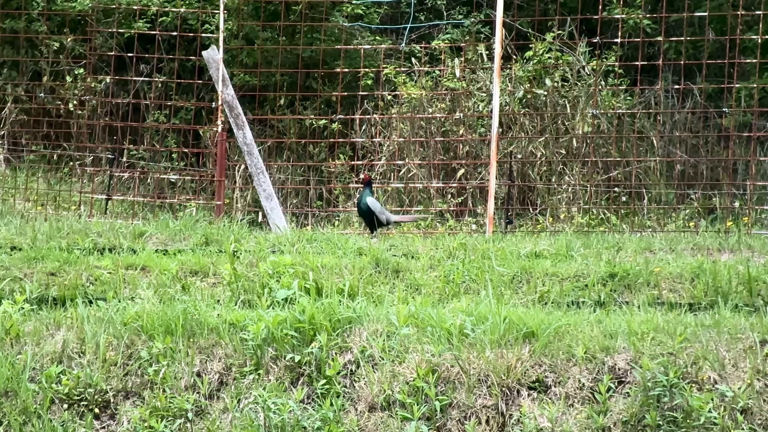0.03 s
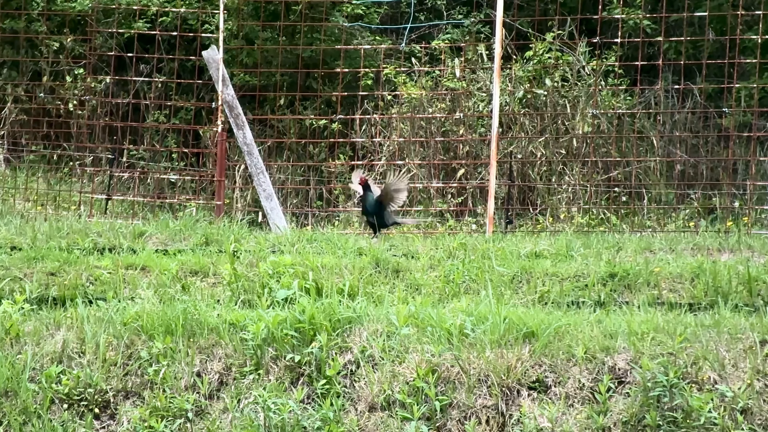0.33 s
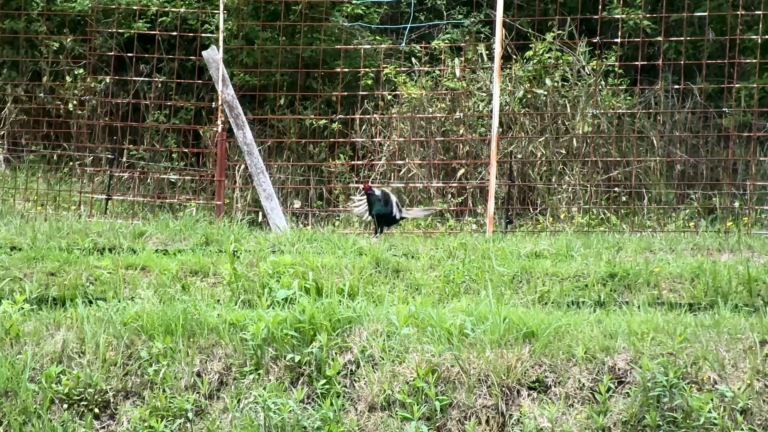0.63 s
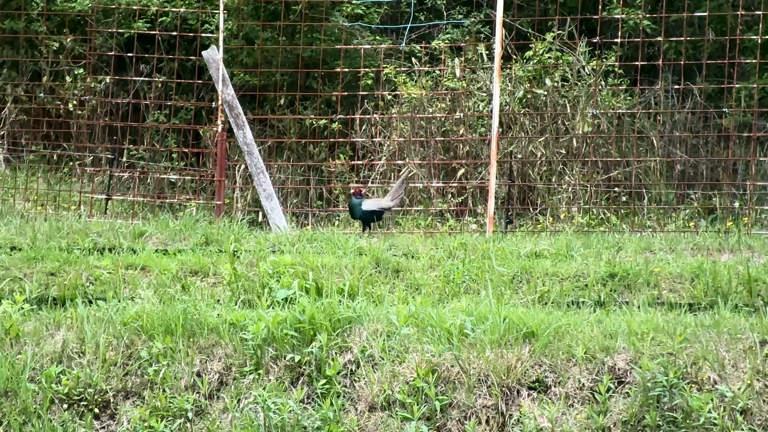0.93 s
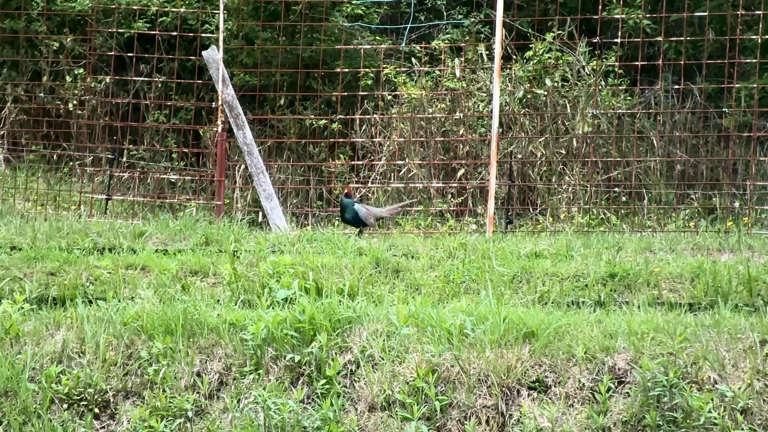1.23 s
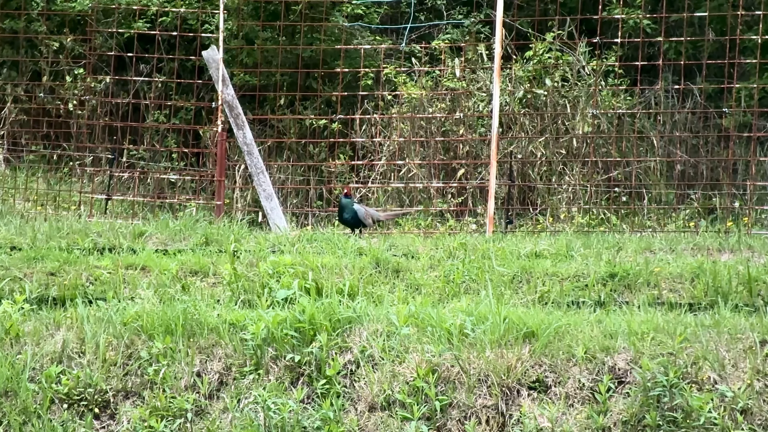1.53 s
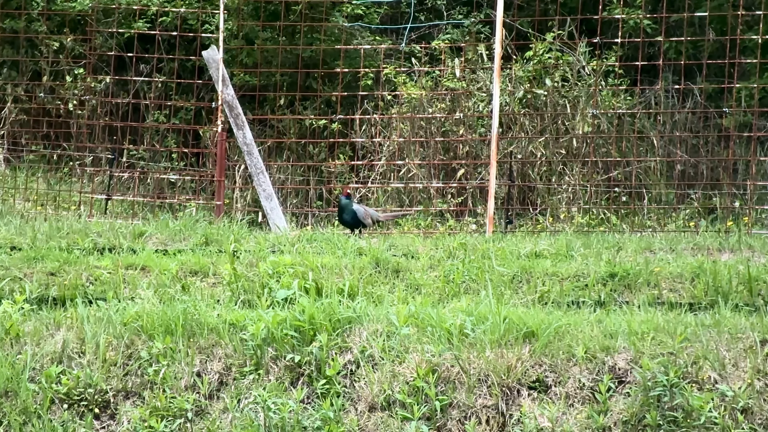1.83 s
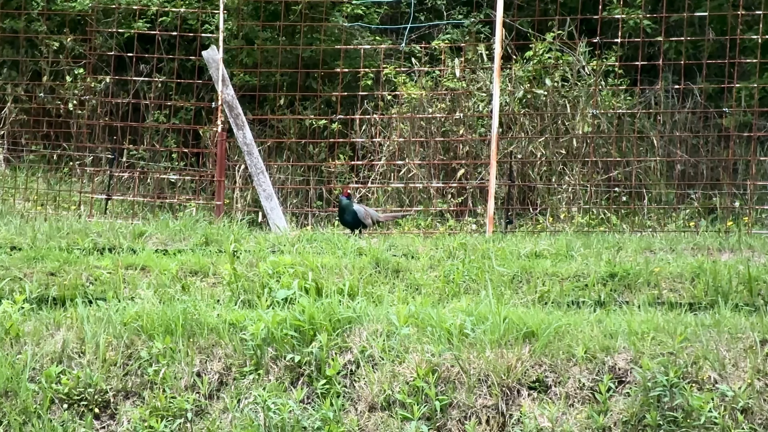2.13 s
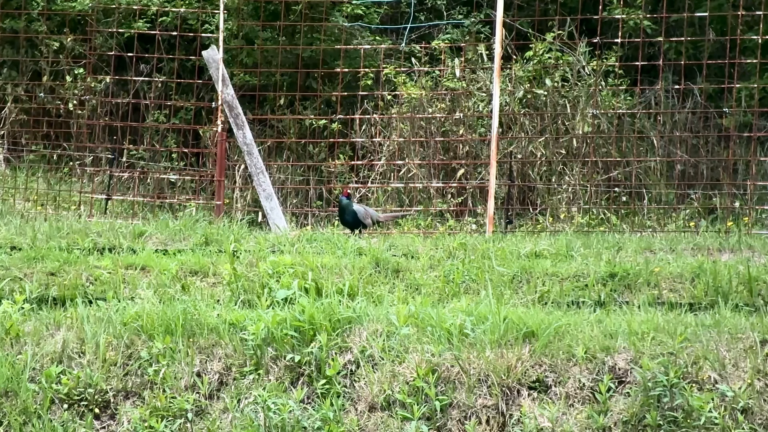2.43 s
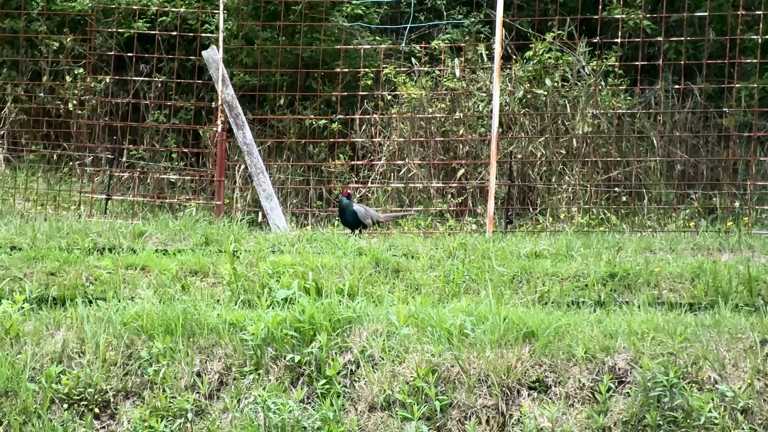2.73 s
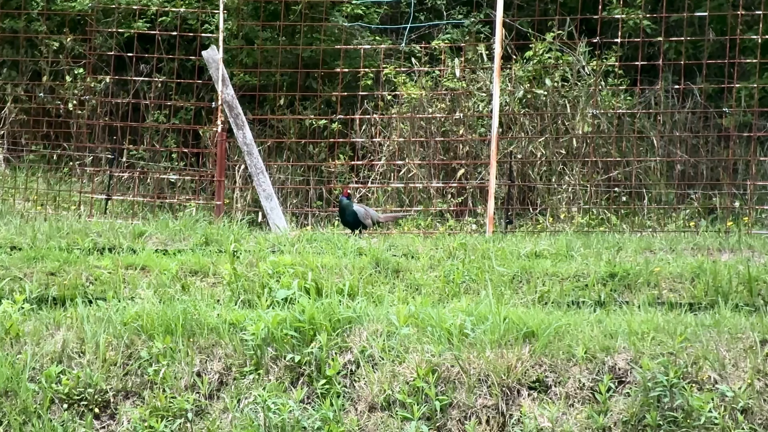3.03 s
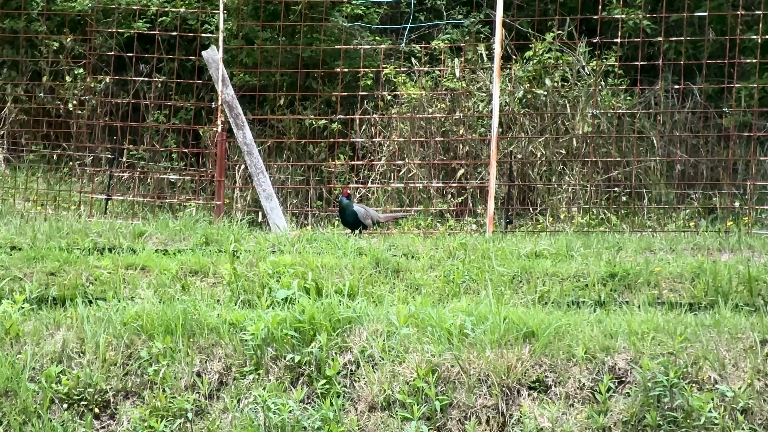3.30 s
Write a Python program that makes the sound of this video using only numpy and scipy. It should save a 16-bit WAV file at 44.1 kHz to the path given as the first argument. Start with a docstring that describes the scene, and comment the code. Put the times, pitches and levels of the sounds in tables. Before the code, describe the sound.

A pheasant crows twice hoarsely, then whirs its wings, over faint birds and rustling leaves.

```python
"""At the edge of a wood, a pheasant gives a two-note crow and drums its wings; the trees throw it back.
The crow is a rough pulse train filtered by throat and beak, and each wing stroke is a low puff of air.
Small birds chip and whistle in gliding tones over the noise of leaves, gurgling water and low wind.
A faint hum fades early; a hollow knock of damped modes and a soft low bump sound close by."""
import sys
import numpy as np
from scipy import signal
from scipy.fft import rfft, irfft, next_fast_len
from scipy.io import wavfile
from scipy.ndimage import uniform_filter1d

SR = 44100
rng = np.random.default_rng(int(sys.argv[2]) if len(sys.argv) > 2 else 0)


def generate_wav(signal):
    """Clip the signal to [-1, 1] and save it as 16-bit WAV at the path in sys.argv[1]."""
    frames = np.transpose(np.atleast_2d(signal))
    scaled = np.clip(frames, -1, 1) * 32767
    pcm = np.round(scaled).astype(np.int16)
    wavfile.write(sys.argv[1], SR, pcm)


N = 176400
TIME = np.arange(N) / SR


def amp(db):
    """Decibels to amplitude ratio."""
    return 10 ** (np.asarray(db) / 20)


def unit(x):
    """Normalisation to rms 1."""
    return x / np.sqrt(np.mean(x ** 2) + 1e-20)


def read(points, hz):
    """Interpolation on a log-frequency axis."""
    f, value = np.transpose(points)
    return np.interp(np.log(hz + 1), np.log(f + 1), value)


def colour(x, points):
    """Zero-phase filtering by (frequency [Hz], gain [dB]) points."""
    size = next_fast_len(x.shape[-1] + 2048)
    gain = amp(read(points, np.fft.rfftfreq(size, 1 / SR)))
    return irfft(rfft(x, size) * gain, size)[..., :x.shape[-1]]


def wander(size, hz):
    """Random modulation: noise of rms 1, low-passed at hz."""
    rolloff = 1 + (np.fft.rfftfreq(N, 1 / SR) / hz) ** 4
    return unit(irfft(rfft(rng.standard_normal(N)) / rolloff, N))[:size]


def tone(hz):
    """A sine whose phase is the integral of frequency."""
    return np.sin(2 * np.pi * np.cumsum(hz) / SR)


def add(mix, s, sound):
    """Superposition of a sound at time s."""
    part = mix[max(round(s * SR), 0):][:len(sound)]
    part += sound[:len(part)]


def swell(t, peak_s):
    """Gamma envelope: a soft rise to 1 at peak_s, then a quick decay."""
    return (t / peak_s * np.exp(1 - t / peak_s)) ** 2


# decay of the wood (frequency [Hz], reverberation time [s])
WOOD_T60 = [(100, 0.13), (1150, 0.92), (2500, 1), (4300, 0.7), (7000, 0.24), (15000, 0.5)]
def wood(x, wet_db, alike):
    """Reverberation: trees scatter dense echoes, the same in both channels when alike is 1."""
    hz, t, noise = signal.stft(rng.standard_normal((2, SR)), SR, nperseg=256)
    decay = amp(-60 * t / read(WOOD_T60, hz)[:, None])
    rise = 1 - np.exp(-t / .014)
    mid, side = signal.istft(noise * decay * rise, SR, nperseg=256)[1]
    side = side * np.sqrt(1 - alike)
    tail = np.array([mid + side, mid - side]) / np.linalg.norm(mid)
    return x + amp(wet_db) * signal.fftconvolve(x[None], tail, axes=1)[:, :len(x)]


# damping of the upper resonance by a shut beak (frequency [Hz], gain [dB])
SHUT_BEAK = [(1200, 3.5), (3600, 1), (4100, -0.5), (4450, 1), (4800, -10), (5300, -10), (5800, -1)]
def note(curve, throat, odd_db, half_db, rattle, rasp, level_db):
    """Source-filter voice: uneven pulses add subharmonics, and a slower oscillator adds sidebands."""
    s, pitch, effort, beak = np.transpose(curve)
    t = np.arange(s[0], s[-1], 1 / SR)
    jitter = 1 + .014 * wander(len(t), 320)
    cycles = np.cumsum(np.interp(t, s, pitch) * jitter) / SR
    shake = tone(165.3 * (1 + .07 * wander(len(t), 61)))
    k = np.arange(2, 49)[:, None] / 2  # harmonic numbers, in half steps
    strength = amp(odd_db * (k % 2 == 1) + half_db * (k % 1 > 0))
    pulses = (strength * np.cos(2 * np.pi * k * (cycles + .075 * rattle * shake) + k ** 2)).sum(0)
    source = (unit(pulses) + rasp * rng.standard_normal(len(t))) * (1 + rattle * shake / 2)
    voice = unit(colour(source, throat))
    opening = np.interp(t, s, beak)
    voice = opening * voice + (1 - opening) * colour(voice, SHUT_BEAK)
    return s[0], voice * amp(level_db + np.interp(t, s, effort))


# vocal gestures (time [s], pitch [Hz], effort [dB], beak opening [0-1])
NOTE_1 = [(-.12, 578, 0, 1), (-.05, 580, -1.5, 0.7), (.005, 577.4, 2, 0.9), (.055, 569.7, -4, 0.96),
          (.10, 562.6, -0.5, 0.36), (.135, 572, -10, 0.3), (.17, 552, -35, 0)]
NOTE_2 = [(.355, 556.7, -23, 0), (.372, 573, -2, 0), (.40, 587.3, -2.5, 0.42), (.417, 581.5, -1.5, 1),
          (.446, 590.6, 1.5, 0.86), (.462, 590, -12, 0.51), (.48, 598.6, -1, 0), (.5, 636, -30, 0.54)]
NOTE_2_END = [(.44, 396.8, -20, 1), (.47, 404.2, -3, 0.7), (.495, 408, -7, 0.9), (.535, 411.8, -4, 0.55),
              (.57, 412.4, -8.5, 0.1), (.6, 414.4, -6, 0)]
# throat resonances of each note (frequency [Hz], gain [dB])
THROAT_1 = [(500, -26), (880, -14), (1050, -3.5), (1180, 1), (1450, -73), (1750, -25), (2300, -18),
            (2900, -17), (3450, -11.5), (4050, 0), (4600, 2), (4900, -13), (5220, 3.5), (5450, -12),
            (5750, -7.5), (6400, -22), (7200, -18), (8200, -41), (9200, -27), (15000, -64)]
THROAT_2 = [(500, -30.5), (880, -14.5), (1020, -1.5), (1210, -1), (1420, -28), (1800, -37), (2350, -18.5),
            (2900, -19.5), (3500, -8), (3800, -10.5), (4050, 2), (4450, 1.5), (4750, -1.5), (5280, 4.5),
            (5520, -7), (5820, -4), (6400, -16.5), (7200, -14), (8200, -54), (9200, -22), (9800, -30),
            (15000, -88)]
def crow():
    """Rough phonation: a hoarse note, then a harsher one that breaks to a slower pulse rate."""
    lead_s = .25  # the first note begins before time zero
    lead = round(lead_s * SR)
    out = np.zeros(lead + N)
    for s, voice in (
        note(NOTE_1, THROAT_1, odd_db=-5.5, half_db=-20, rattle=.12, rasp=.55, level_db=-43.5),
        note(NOTE_2, THROAT_2, odd_db=4, half_db=1.5, rattle=.27, rasp=.4, level_db=-39),
        note(NOTE_2_END, THROAT_2, odd_db=1, half_db=-36, rattle=.097, rasp=.3, level_db=-44),
    ):
        add(out, lead_s + s, voice)
    return wood(out, wet_db=-1.5, alike=.93)[:, lead:]


# stereo width (frequency [Hz], side minus mid [dB])
WASH_WIDTH = [(60, -24), (150, -12.5), (300, -11.5), (500, -1.5), (750, 0), (1200, -5.5), (2200, -23.5),
              (3300, -9), (4300, -19.5), (5500, -70), (15000, -59)]
def wash(spectrum, depth_db, patch_hz, patch_s):
    """Modulated stereo noise: the level drifts in patches of time and frequency."""
    frames = dict(nperseg=512, noverlap=384)
    noise = signal.stft(rng.standard_normal((2, N)), **frames)[2]
    patches = uniform_filter1d(rng.standard_normal(noise.shape[1:]), round(patch_hz * 512 / SR), 0)
    patches = unit(uniform_filter1d(patches, round(patch_s * SR / 128), 1))
    mottled = signal.istft(noise * amp(depth_db * patches), **frames)[1][:, :N]
    mid, side = colour(mottled, spectrum)
    side = colour(side, WASH_WIDTH)
    return unit(np.array([mid + side, mid - side]))


# rustle spectrum (frequency [Hz], relative density [dB])
LEAF_SPECTRUM = [(900, -15.5), (1700, -11.5), (2200, -7.5), (2800, -2), (3500, 4), (4300, 1.5),
                 (5200, -8.5), (6300, -12.5), (7400, -14), (8200, -32), (8800, -13), (9200, -21),
                 (10000, -14.5), (10800, -24), (11700, -49), (12600, -35), (13600, -19), (14500, -40),
                 (15700, -12)]
def leaves():
    """Incoherent summation: many leaves merge into a steady hiss."""
    return amp(-58.5) * wash(LEAF_SPECTRUM, depth_db=2.5, patch_hz=600, patch_s=.026)


# clearer ticks (time [s], level [dB])
LEAF_TICKS = [(0.793, -50.5), (.994, -72), (1.247, -50.5), (1.345, -57), (1.528, -53.5), (1.596, -57),
              (1.741, -50.5), (2.138, -57), (2.29, -47.5), (2.443, -57), (2.986, -54), (3.392, -56),
              (3.448, -53), (3.577, -59), (3.602, -57)]
# their spectrum (frequency [Hz], gain [dB])
TICK_SPECTRUM = [(800, -28), (2000, 2), (4000, 6), (7000, 0), (8200, -5), (9200, -13.5), (10000, -3.5),
                 (12000, -30.5), (15000, -22)]
def ticks(per_s, spread_db, level_db):
    """Shot noise: a fine random crackle among the leaves, with a few clearer ticks."""
    impulses = amp(spread_db * np.minimum(rng.exponential(1, N), 2)) * (rng.random(N) < per_s / SR)
    t = np.arange(0, .008, 1 / SR)
    envelope = amp(level_db) * unit(signal.oaconvolve(impulses, np.exp(-t / .00032))[:N])
    for s, db in LEAF_TICKS:
        add(envelope, s, amp(db) * np.exp(-t / .0038))
    return envelope * unit(colour(rng.standard_normal(N), TICK_SPECTRUM))


# flow spectrum (frequency [Hz], relative density [dB]) and strength (time [s], level [dB])
WATER_SPECTRUM = [(60, 1), (150, -3.5), (300, 0.5), (400, -3), (520, -1.5), (800, -0.5), (1000, 3),
                  (1270, 1.5), (1550, -10), (2200, -50), (5000, -33.5)]
WATER_LEVEL = [(0, -61), (.8, -57.5), (1.2, -59.5), (1.55, -58.5), (1.95, -58.5), (2.45, -60), (2.8, -59),
               (2.96, -63.5), (3.15, -62.5), (3.3, -60.5), (3.55, -57.5), (3.66, -66.5), (4, -68)]
def water():
    """Flow noise: running water swells and ebbs."""
    envelope = amp(np.interp(TIME, *np.transpose(WATER_LEVEL)))
    return envelope * wash(WATER_SPECTRUM, depth_db=3.5, patch_hz=200, patch_s=.032)


# rumble spectrum (frequency [Hz], relative density [dB]) and gusts (time [s], level [dB])
WIND_SPECTRUM = [(15, -24), (30, -21), (50, -3), (75, 0.5), (110, -5), (170, -9.5), (260, -30), (600, -72)]
WIND_LEVEL = [(0, -58.5), (.6, -61.5), (1.1, -58), (1.22, -74), (1.31, -55.5), (1.42, -63), (1.9, -63),
              (2.1, -71), (2.55, -60), (2.95, -73), (3.1, -60.5), (3.3, -71), (3.55, -68), (3.7, -71.5),
              (4, -81)]
def wind():
    """Turbulence: slow pressure fluctuations make a low rumble."""
    envelope = amp(np.interp(TIME, *np.transpose(WIND_LEVEL)))
    return envelope * wash(WIND_SPECTRUM, depth_db=1.5, patch_hz=200, patch_s=.058)


def hum():
    """Slight frequency modulation: a faint low tone wavers and fades."""
    return amp(np.interp(TIME, [0, .6, .9], [-58, -58, -85])) * tone(105 + 2 * wander(N, 13))


# water blips (time [s], level [dB], frequency [Hz])
BLIPS = [(.21, -50.5, 648), (1.421, -55.5, 259), (1.558, -49, 653), (1.866, -59.5, 456),
         (2.155, -54.5, 475), (2.21, -57, 520), (2.31, -57, 536), (2.374, -49.5, 810), (2.45, -51, 480),
         (2.453, -59, 738), (2.521, -56, 164.5), (2.63, -56.5, 257), (3.036, -53, 1250), (3.25, -55.5, 820),
         (3.3, -54.5, 523)]
def gurgles():
    """Damped resonance: hollow blips of water, unsteady in pitch."""
    out, t = np.zeros(N), np.arange(0, .08, 1 / SR)
    for s, db, hz in BLIPS:
        add(out, s, amp(db) * swell(t, peak_s=.012) * tone(hz + 64.7 * wander(len(t), 174)))
    return wood(out, wet_db=-7.5, alike=.89)


# short high chips (time [s], level [dB], frequency [Hz])
HIGH_CHIPS = [(.266, -49.5, 2590), (0.766, -37.5, 3430), (0.834, -41, 3550), (0.909, -46.5, 4140),
              (1.066, -45.5, 4150), (1.082, -46.5, 3130), (1.677, -48, 3290), (1.833, -44.5, 3560),
              (1.942, -50.5, 3400), (2.308, -38.5, 3400), (2.566, -48.5, 2750), (2.676, -45, 3420),
              (2.709, -48.5, 3100), (3.508, -46.5, 3330), (3.654, -48.5, 3540), (3.699, -53, 2560),
              (3.825, -49, 3670), (3.846, -47, 3740), (3.86, -58, 2450), (3.96, -54, 2630)]
def chips(peak_s=.0018, fall_per_s=4):
    """Tone bursts: a small bird's calls, mixed with fainter, lower leaf ticks or drips."""
    out, t = np.zeros(N), np.arange(0, .015, 1 / SR)
    for s, db, hz in HIGH_CHIPS:
        pitch = hz * np.exp(-fall_per_s * (t - peak_s)) * (1 + .044 * wander(len(t), 600))
        add(out, s, amp(db) * swell(t, peak_s) * tone(pitch))
    return wood(out, wet_db=-11.5, alike=1)


# wing strokes (time [s], level [dB], frequency [Hz])
STROKES = [(.634, -48, 137), (.657, -49, 124), (.677, -47.5, 119), (.712, -42.5, 136), (0.752, -54, 100),
           (0.8, -44, 135), (.838, -51, 144), (.879, -47, 149), (0.9, -43.5, 114), (.949, -49, 120),
           (.976, -44.5, 115), (0.998, -54, 125), (1.026, -46.5, 145), (1.045, -48, 110), (1.093, -49, 142),
           (1.115, -48.5, 120), (1.145, -58, 135)]
def wings(peak_s=.005):
    """Air displacement: each stroke radiates a short low pressure pulse."""
    out, t = np.zeros(N), np.arange(0, .06, 1 / SR)
    for s, db, hz in STROKES:
        add(out, s, amp(db) * swell(t, peak_s) * np.cos(2 * np.pi * hz * (t - peak_s)))
    return wood(out, wet_db=-4, alike=.85)


# slurred calls (time [s], duration [s], start [Hz], middle [Hz], end [Hz], level [dB])
BIRD_SLURS = [(0.675, 0.057, 4250, 5060, 6200, -58.5), (0.754, 0.06, 4400, 5280, 4660, -54.5),
              (0.965, 0.037, 3680, 5070, 6120, -53), (0.966, 0.074, 3560, 5240, 6560, -60.5),
              (1.055, 0.031, 5820, 5100, 3650, -62), (1.212, .035, 3870, 5000, 5730, -62),
              (1.239, 0.12, 4140, 4170, 4330, -63), (1.467, 0.073, 3600, 3930, 4100, -57),
              (1.537, .018, 4900, 5420, 5840, -56.5), (1.562, 0.057, 3740, 4530, 5830, -57),
              (1.597, 0.041, 5500, 5980, 5370, -61), (1.748, 0.059, 3690, 3850, 4240, -55),
              (1.985, 0.084, 3550, 4080, 4430, -57), (2.047, 0.063, 4600, 5450, 6400, -72),
              (2.212, 0.041, 3620, 3700, 3950, -53.5), (2.445, 0.073, 3550, 3810, 4200, -56.5),
              (2.53, 0.056, 4400, 5140, 5670, -61), (2.68, .07, 3550, 3850, 4290, -53),
              (3.311, .019, 5630, 5200, 4900, -59), (3.372, 0.015, 5600, 5180, 4800, -59),
              (3.372, 0.12, 3450, 3945, 4060, -57.5)]
def whistles():
    """Frequency glides: small birds slur thin tones along parabolas, blurred by the trees."""
    out = np.zeros(N)
    for s, length, start, middle, end, db in BIRD_SLURS:
        u = np.linspace(0, 1, round(length * SR))
        glide = np.polyval(np.polyfit([0, .5, 1], [start, middle, end], 2), u)
        warble = 1 + .014 * (middle / 4000) ** 3 * wander(len(u), 500)
        flutter_db = 1.56 * wander(len(u), 130)
        arch = abs(np.sin(np.pi * u)) ** .72
        add(out, s, amp(db + flutter_db) * arch * tone(glide * warble))
    return wood(out, wet_db=-7.5, alike=1)


# modes of the knock (time [s], level [dB], frequency [Hz], rise time [s])
KNOCK_MODES = [(1.2606, -37, 623, 0.0023), (1.2651, -39, 290, 0.0051), (1.27, -44.5, 141, 0.0063)]
def knock():
    """Modal vibration: a hollow knock whose low modes swell later than the high one."""
    out, t = np.zeros(N), np.arange(0, .08, 1 / SR)
    for s, db, hz, peak_s in KNOCK_MODES:
        add(out, s, amp(db) * swell(t, peak_s) * np.sin(2 * np.pi * hz * t))
    return wood(out, wet_db=-13.5, alike=1)


def bump(hz=65.6, length_s=.05):
    """A windowed tone: a few low cycles are heard as one soft bump."""
    out, t = np.zeros(N), np.arange(0, length_s, 1 / SR)
    window = np.sin(np.pi * t / length_s) ** 2
    add(out, 2.994, amp(-41) * window * np.sin(2 * np.pi * hz * t))
    return wood(out, wet_db=-13.5, alike=1)


def scene():
    """Superposition of all sources; a level difference sets the low ones slightly left."""
    centre = crow() + leaves() + ticks(per_s=60, spread_db=.5, level_db=-73) + chips() + whistles()
    low_bed = (water() + wind() + hum()) * amp([[1], [-1]])
    low_events = (gurgles() + wings() + knock() + bump()) * amp([[.9], [-.9]])
    return centre + low_bed + low_events


# phase between the microphone ports (frequency [Hz], phase [rad])
PORT_SHIFT = [(5500, .05), (6700, .25), (7050, .9), (7500, 1.55), (7950, 2.97), (8300, 3.14), (8850, 3.0),
              (9200, 1.55), (10000, 1.05), (10800, .25), (13500, .25), (14500, 1.35), (15400, 2.4)]
def record(dry, cutoff_hz=15700):
    """Phase shift and band limit: the two ports fall out of phase in parts of the treble."""
    turn = np.exp(.5j * read(PORT_SHIFT, np.fft.rfftfreq(N, 1 / SR)))
    ports = irfft(rfft(dry) * np.array([turn, turn.conj()]), N)
    lowpass = signal.firwin(511, cutoff_hz, window=("kaiser", 9), fs=SR)
    return signal.oaconvolve(ports, lowpass[None], "same")


dry = scene()
out = record(dry)
generate_wav(out)
```